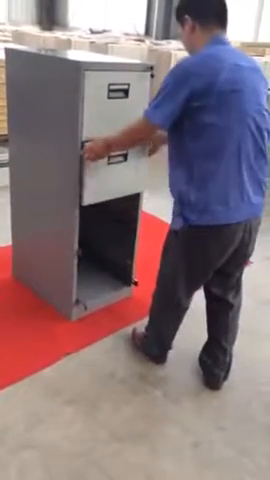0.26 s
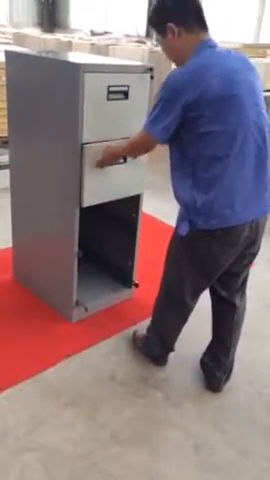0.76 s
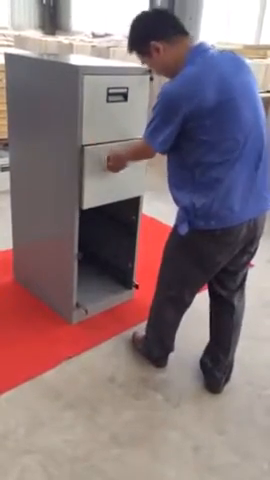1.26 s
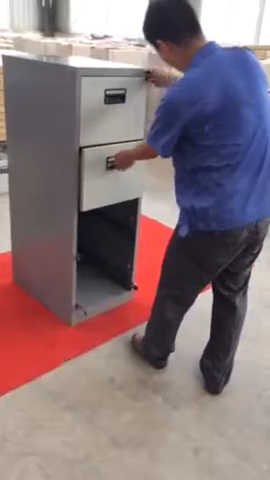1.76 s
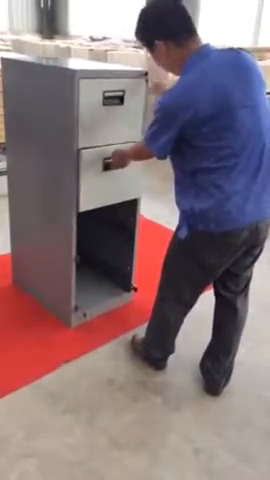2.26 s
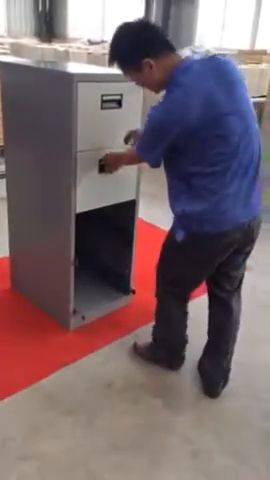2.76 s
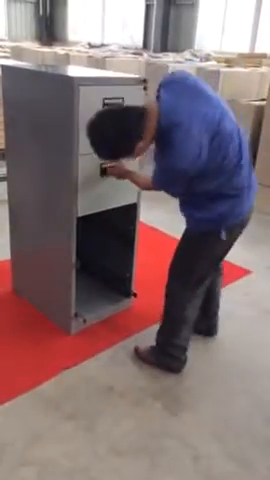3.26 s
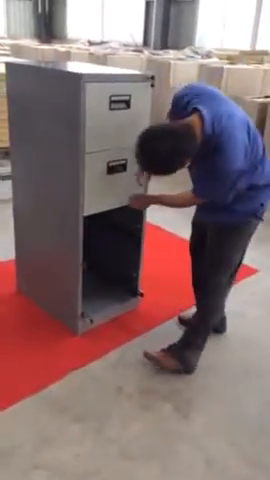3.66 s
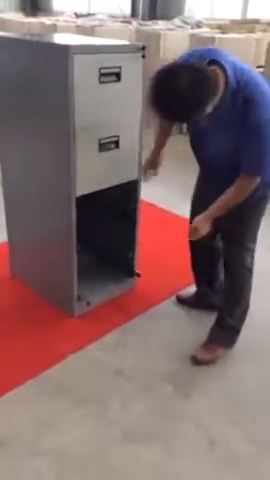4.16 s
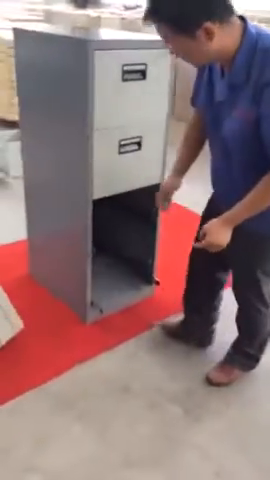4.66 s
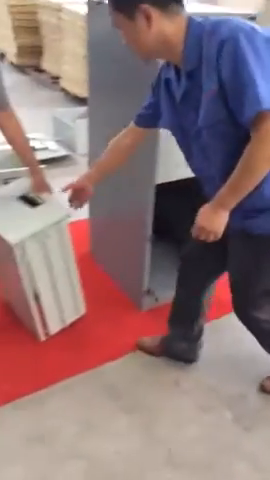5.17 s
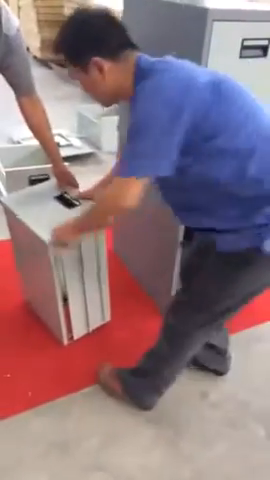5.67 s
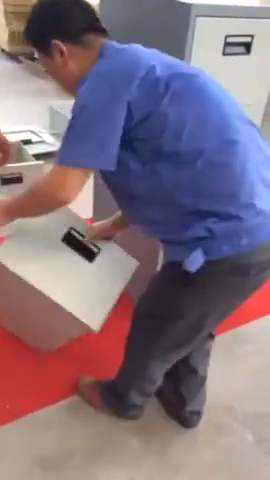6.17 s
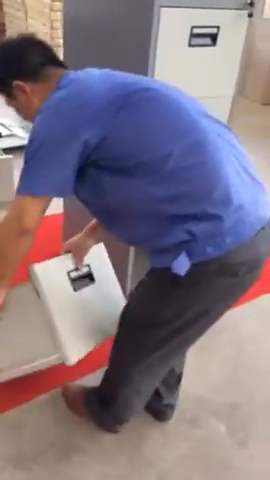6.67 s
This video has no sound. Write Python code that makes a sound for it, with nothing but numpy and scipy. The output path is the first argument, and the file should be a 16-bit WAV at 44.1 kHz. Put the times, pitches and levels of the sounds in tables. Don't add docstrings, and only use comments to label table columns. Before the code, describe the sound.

A large factory hall rumbles with a low, fuzzy machine drone throughout. At once a steel drawer rolls over rough runners with quick dry chirps and a thin squeal, stopping at 0.3 s in a loud, bright, ringing clunk. Around 0.9 s the latch clacks and the cabinet gives a light low bump. From 1.2 to 1.9 s a distant tool whirs with a fading whistle, with a faint low squeak near 1.4 s. Small ticks and loose rattles come at 2.0-2.6 s, then at 2.63 s the drawer slams and the hollow cabinet booms deeply. From 2.95 s a far air gun surges and hisses steadily until about 6.3 s, trailing off in echo. A dull low double thump lands at 4 s. From 6.4 s steel drags over a floor mat with faint knocks until the end. The microphone is close to the cabinet.

```python
import sys
import numpy as np
from scipy import signal
from scipy.io import wavfile
from scipy.ndimage import uniform_filter1d

SR = 44100
rng = np.random.default_rng(int(sys.argv[2]) if len(sys.argv) > 2 else 0)


def rack_gain(trim_db):
    fader = np.asarray(trim_db, float)
    return 10 ** (fader / 20)


def transcribe(signal):
    frames = np.atleast_2d(signal).T
    limited = np.clip(frames, -1, 1)
    pcm = np.round(limited * 32767).astype(np.int16)
    wavfile.write(sys.argv[1], SR, pcm)


N = 304731


def clock():
    return np.arange(N) / SR


def evened(x):
    return x / np.sqrt(np.mean(x ** 2) + 1e-20)


def read_curve(points, hz):
    f, value = np.transpose(points)
    return np.interp(np.log(hz + 1), np.log(f + 1), value)


def add(mix, start_s, sound):
    part = mix[round(start_s * SR):][:len(sound)]
    part += sound[:len(part)]


def band(x, lo_hz, hi_hz, order=2):
    edges = np.clip([lo_hz, hi_hz], 10, SR / 2 - 100)
    return signal.sosfilt(signal.butter(order, edges, "band", fs=SR, output="sos"), x)


def resonate(x, hz, width_hz):
    r = np.exp(-np.pi * width_hz / SR)
    return 2 * signal.lfilter([1 - r], [1, -r * np.exp(2j * np.pi * hz / SR)], x).real


def noise(spectrum, patchy_db, flicker_db):
    frames, hz = N // 512 + 3, np.fft.rfftfreq(1024, 1 / SR)
    a, b, patches = rng.standard_normal((frames, 513, 3)).T
    patches = uniform_filter1d(patches, size=10, axis=0)
    patches = evened(uniform_filter1d(patches, size=6, axis=1))
    flicker = evened(uniform_filter1d(rng.standard_normal(frames), size=4))
    level_db = read_curve(spectrum, hz)[:, None] + patchy_db * patches + flicker_db * flicker
    z = (a + 1j * b) * rack_gain(level_db)
    return evened(signal.istft(z, window="cosine", nperseg=1024, noverlap=512)[1][:N])


def tail(decays):
    hz, t, z = signal.stft(rng.standard_normal(SR // 2), SR, nperseg=256)
    dying = rack_gain(-60 * t / read_curve(decays, hz)[:, None])
    return signal.istft(z * dying, SR, nperseg=256)[1][:SR // 2]


def held(db, start_s, attack_s, stop_s, t60_s, sag_db_per_s=0):
    t = clock()
    rise = np.sin(np.pi / 2 * np.clip((t - start_s) / attack_s, 0, 1)) ** 2
    sag_db = sag_db_per_s * np.maximum(t - start_s - attack_s, 0)
    decay_db = 60 * np.maximum(t - stop_s, 0) / t60_s
    return rise * rack_gain(db - sag_db - decay_db)


# pitch_hz [Hz], level_db [dB per Hz]
RUMBLE = [(12, -37), (20, -16), (55, -6.5), (108, -2.5), (145, -2.5), (374, -15), (474, -17), (556, -21),
          (634, -18.5), (723, -22), (917, -23), (1160, -24.5), (1360, -25.5), (7180, -37), (11000, -43.5),
          (14200, -76), (22000, -120)]
# pitch_hz [Hz], width_hz [Hz], level_db [dB]
HUM = [(81.7, 19, -43), (144.3, 6.2, -45.5), (188.3, 12, -38.5), (284, 19, -50)]
# middle_s [s], rise_db [dB], half_length_s [s]
SWELLS = [
    (0.248, 3.5, 0.5),
    (2.79, 2, 0.48),
    (4.036, 5, 0.12),
    (5.8, 0.5, 0.31),
]


def hall():
    t = clock()
    rumble = noise(RUMBLE, 1.8, 0.89)
    rumble = rumble / np.std(band(rumble, 60, 350, order=4))
    swell_db = sum(db * np.exp(-((t - s) / half) ** 2) for s, db, half in SWELLS)
    rumble = rumble * rack_gain(-37 + swell_db)
    drone = sum(rack_gain(db) * evened(resonate(rng.standard_normal(N), hz, w)) for hz, w, db in HUM)
    return rack_gain(-2.5) * rumble + rack_gain(-4.0) * drone


# pitch_hz [Hz], width_hz [Hz], level_db [dB]
WHIR_PEAKS = [(1020, 16, 9), (1800, 83, 5), (3060, 33, 6), (4460, 130, -18), (5020, 56, -22)]


def far_tool():
    hiss = band(rng.standard_normal(N), 950, 9000)
    tones = sum(rack_gain(db) * evened(resonate(hiss, hz, w)) for hz, w, db in WHIR_PEAKS)
    speed = held(-48, start_s=1.18, attack_s=0.54, stop_s=1.93, t60_s=0.084, sag_db_per_s=23)
    return speed * (rack_gain(-2) * evened(hiss) + rack_gain(-6) * evened(tones))


# pitch_hz [Hz], level_db [dB per Hz]
JET = [(410, -31), (700, -31), (794, -17.5), (1070, -16.5), (1150, -19), (1330, -14), (3430, -3),
       (3710, -2.5), (4260, -3), (6680, -1), (9870, -5), (10600, -14), (11000, -60), (14200, -54),
       (22000, -120)]


def air_gun():
    open_s, surge_db, surge_s = 2.944, 3.5, 0.38
    dull_hz, fills_s = 4520, 0.11
    since = np.maximum(clock() - open_s, 0)
    surge = rack_gain(surge_db * since / surge_s * np.exp(1 - since / surge_s))
    valve = held(-33, open_s, attack_s=0.12, stop_s=6.343, t60_s=1.36, sag_db_per_s=-0.4)
    jet = noise(JET, 1.2, 0.45)
    dull = signal.sosfiltfilt(signal.butter(2, dull_hz, fs=SR, output="sos"), jet)
    return surge * valve * (jet - dull * np.exp(-since / fills_s))


def mode_ring(modes, damping):
    t = np.arange(SR // 2) / SR
    ring = np.zeros(len(t))
    for hz, db, t60 in modes:
        fade_db = damping * 60 * t / min(t60, 0.25)
        ring += rack_gain(db / 2 - fade_db) * np.sin(2 * np.pi * hz * t)
    return evened(ring)


# pitch_hz [Hz], level_db [dB], t60_s [s]
DRAWER = [(677.4, 24.5, 5.0), (924, -1, 0.4), (1280, 2, 0.071), (1452, 8, 0.26), (2410, 2, 0.076),
          (2570, -19, 0.16), (3250, -8.5, 0.29), (3750, 6, 0.15), (3920, -2, 0.15), (4780, -6, 0.11),
          (5200, 3, 0.16), (5840, -13, 0.26), (6040, -9, 0.097), (6670, -8, 0.079)]


def drawer_body():
    return mode_ring(DRAWER, damping=1.9)


# pitch_hz [Hz], level_db [dB], t60_s [s]
CABINET = [(174, 7, 0.24), (556.3, -18, 0.21), (745, -17, 0.72), (930, -17, 0.39), (970, -23, 0.36),
           (1087, -13, 0.56), (1330, -41, 0.11), (1378, -1, 0.39), (2010, -25, 0.38), (2360, -14, 0.23),
           (2380, -15, 0.34), (3270, -35, 0.24), (4070, -34, 0.45), (4730, -35, 0.4)]


def cabinet_body():
    return mode_ring(CABINET, damping=1.5)


def stroke(pressure, spectrum):
    moving = pressure * noise(spectrum, 1.2, 0.5)
    ring = mode_ring(CABINET[1:] + DRAWER, damping=2.6)[:4000]
    rung = signal.oaconvolve(moving, ring / np.linalg.norm(ring))[:N]
    return rack_gain(5.0) * moving + rack_gain(-24) * rung


# pitch_hz [Hz], level_db [dB per Hz]
DRAG = [(150, -40), (250, -5.5), (316, 2), (370, -13), (412, -9.5), (1530, -15), (3680, -16.5),
        (7330, -23.5), (10500, -49), (13600, -64), (22000, -120)]


def dragging():
    pressure = held(-42, start_s=6.37, attack_s=0.2, stop_s=N / SR, t60_s=1, sag_db_per_s=0.5)
    return stroke(pressure, DRAG)


# pitch_hz [Hz], level_db [dB per Hz]
ROLL = [(150, -37), (250, 1.5), (439, -16.5), (713, -9), (2000, -21.5), (3680, -22.5), (5360, -34),
        (7560, -32), (10500, -38), (13600, -68), (22000, -120)]


def rolling():
    start_db, slows_db_per_s, stop_s = -41, 29, 0.34
    t = clock()
    return stroke(rack_gain(start_db - slows_db_per_s * t) * (t < stop_s), ROLL)


# start_s [s], length_s [s], pitch_hz [Hz], width_hz [Hz],
# level_db [dB]
WHISTLES = [
    (.005, .018, 7500, 550, -44),
    (.027, .014, 7500, 550, -45),
    (.048, .016, 7500, 550, -44),
    (.03, .2, 3700, 260, -51),
    (.225, .05, 4200, 240, -49),
    (.14, .025, 6200, 350, -56),
    (1.37, .16, 1050, 40, -53),
]


def whistles(steel):
    for start_s, length_s, hz, width_hz, db in WHISTLES:
        count = round(length_s * SR)
        whistle = resonate(rng.standard_normal(SR // 2), hz, width_hz)
        whistle = resonate(whistle, hz, width_hz)[2000:][:count]
        add(steel, start_s, rack_gain(db) * evened(whistle) * signal.windows.tukey(count, 0.5))


# pitch_hz [Hz], t60_s [s]
PANELS = [(80, .5), (200, 0.95), (500, 0.4), (1200, 0.17), (3000, 0.14), (9000, 0.032)]


def knock(db, hz, octaves, treble_db, rattle_s, modes):
    lo_hz, hi_hz = hz / 2 ** (octaves / 2), hz * 2 ** (octaves / 2)
    t = np.arange(SR // 3) / SR
    uneven = rack_gain(2.0 * evened(uniform_filter1d(rng.standard_normal(len(t)), size=60)))
    force = np.exp(-(t / rattle_s) ** 2) * (1 + 0.9 * np.exp(-t / 0.004))
    force = force * np.minimum(t / 0.00035, 1)
    hits = rng.standard_normal(len(t)) * uneven * force
    treble = band(band(hits, hi_hz, 8700), 200, 1570, order=1)
    hits = evened(band(hits, lo_hz, hi_hz)) + rack_gain(treble_db) * evened(treble)
    body = modes + 1.53 * evened(tail(PANELS))
    rung = signal.fftconvolve(hits, body)[:len(t)]
    sound = evened(hits) + 1.24 * evened(rung)
    loudest = np.sqrt(uniform_filter1d(sound ** 2, size=400).max())
    return rack_gain(db) * sound / loudest


# start_s [s], peak_db [dB], pitch_hz [Hz], rattle_s [s]
TICKS = [
    (0.323, -22, 5140, 0.013),
    (2.111, -38.5, 720, 0.0064),
    (2.17, -43, 940, .014),
    (2.275, -49.5, 2860, 0.028),
]


def runner_ticks(steel):
    for start_s, db, hz, rattle_s in TICKS:
        add(steel, start_s, knock(db, hz, 0.41, -15, rattle_s, drawer_body()))


# start_s [s], peak_db [dB], rattle_s [s]
LATCH = [(0.292, -32, 0.0087), (.302, -27.5, 0.08), (.857, -37, 0.0063), (0.865, -28.5, 0.011),
         (.878, -34, 0.054), (2.021, -39.5, 0.019), (2.104, -33.5, 0.01), (2.122, -40.5, 0.024),
         (2.32, -44.5, 0.068), (2.486, -38, .022), (2.51, -41, .038), (2.56, -44.5, 0.056)]


def latch_clacks(steel):
    for start_s, db, rattle_s in LATCH:
        add(steel, start_s, knock(db, 1376, 0.86, -3.5, rattle_s, drawer_body()))


# start_s [s], peak_db [dB], pitch_hz [Hz], spread_octaves [octaves], rattle_s [s]
JOLTS = [
    (.318, -31, 4600, 1.5, .008),
    (.324, -17.5, 1880, 2.84, 0.038),
    (2.035, -36.5, 1290, 1.5, 0.063),
    (2.093, -42, 2700, 1.3, 0.015),
    (2.155, -43.5, 3930, 1.7, 0.021),
]


def drawer_jolts(steel):
    for start_s, db, hz, octaves, rattle_s in JOLTS:
        add(steel, start_s, knock(db, hz, octaves, -12.5, rattle_s, drawer_body()))


# start_s [s], peak_db [dB], pitch_hz [Hz]
THUDS = [(.905, -31, 745), (.922, -29, 345), (.945, -36, 776), (3.959, -28, 570), (3.985, -35, 1080),
         (4.003, -37, 710), (4.015, -34.5, 365), (4.04, -46, 515), (6.55, -39, 800), (6.78, -43, 1050),
         (6.85, -39, 1150)]


def cabinet_thuds(steel):
    for start_s, db, hz in THUDS:
        add(steel, start_s, knock(db, hz, 0.85, -18, 0.02, cabinet_body()))


# start_s [s], peak_db [dB], pitch_hz [Hz], spread_octaves [octaves], rattle_s [s]
SLAM = [
    (2.627, -18, 640, 2.6, .024),
    (2.648, -20, 284, 3, 0.0116),
    (2.658, -27, 600, 2.3, 0.067),
]


def drawer_slam(steel):
    for start_s, db, hz, octaves, rattle_s in SLAM:
        add(steel, start_s, knock(db, hz, octaves, -9.5, rattle_s, cabinet_body()))


# start_s [s], level_db [dB], pitch_hz [Hz], t60_s [s], unevenness [0-1]
BOOMS = [
    (0.9, -20, 104, 0.075, 0.3),
    (0.913, -19, 209, 0.079, .1),
    (2.630, -10.5, 185, 0.12, 0.3),
    (2.639, -16, 92, 0.14, 0.05),
    (2.641, -37, 249, 0.35, 0.08),
    (2.668, -20, 192, .15, 0.4),
    (2.701, -29, 104.8, 1.4, 0.45),
    (3.959, -17, 306, 0.076, 0.1),
    (3.96, -13, 111, .08, 0),
    (3.978, -17.5, 96, 0.11, 0.15),
]


def cabinet_booms(steel):
    t = np.arange(SR) / SR
    for start_s, db, hz, t60_s, uneven in BOOMS:
        wobble = 1 + uneven * evened(resonate(rng.standard_normal(SR), 14, 21))
        swing = -np.sin(2 * np.pi * hz * t) * np.minimum(t / 0.0095, 1)
        add(steel, start_s, rack_gain(db - 60 * t / t60_s) * swing * wobble)


# pitch_hz [Hz], t60_s [s]
ECHO = [(200, 1.4), (1000, 0.48), (4000, 0.65), (9000, 0.49)]


def with_echo(steel):
    echo = tail(ECHO)
    return steel + rack_gain(-17.0) * signal.fftconvolve(steel, echo / np.linalg.norm(echo))[:N]


def scene():
    behind = hall() + far_tool() + air_gun()
    steel = dragging() + rolling()
    for play in (whistles, runner_ticks, latch_clacks, drawer_jolts, cabinet_thuds, drawer_slam, cabinet_booms):
        play(steel)
    return np.tile(with_echo(steel) + behind, (2, 1))


def band_limit(x):
    return signal.sosfilt(signal.butter(12, 11100, fs=SR, output="sos"), x)


def record(dry):
    rounded = 0.62 * np.tanh(dry / 0.62)
    treble_cut = signal.firwin(255, 10750, window=("kaiser", 5.5), fs=SR)
    limited = signal.oaconvolve(rounded, treble_cut[None], "same")
    return band_limit(limited)


dry = scene()
out = record(dry)
transcribe(out)
```